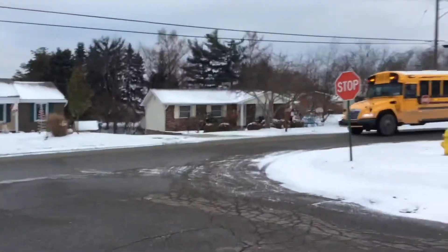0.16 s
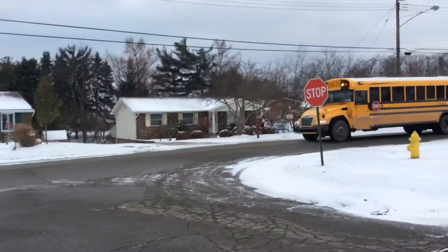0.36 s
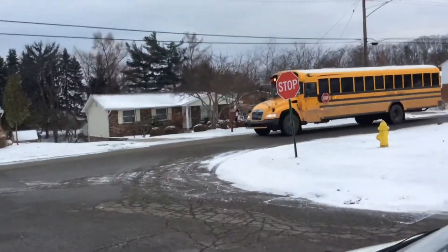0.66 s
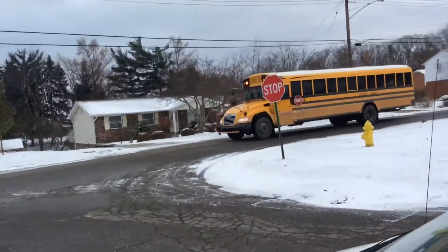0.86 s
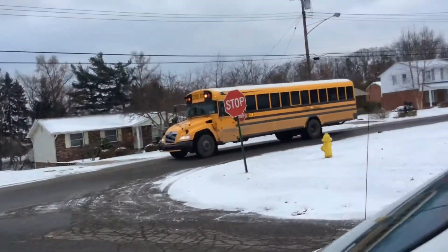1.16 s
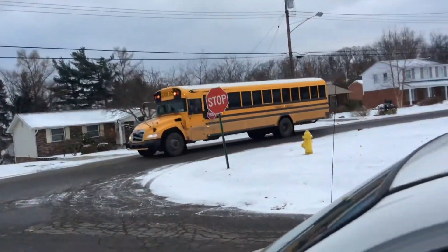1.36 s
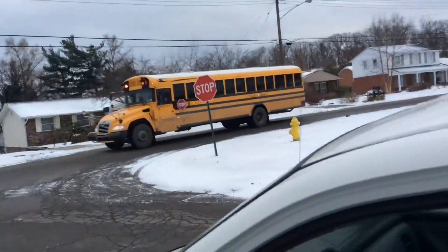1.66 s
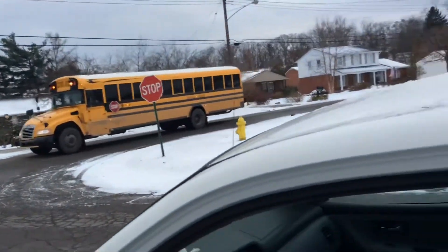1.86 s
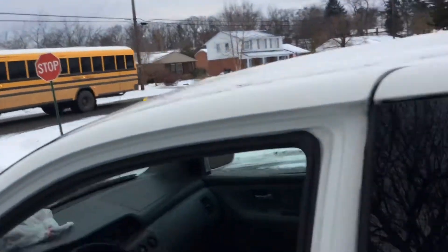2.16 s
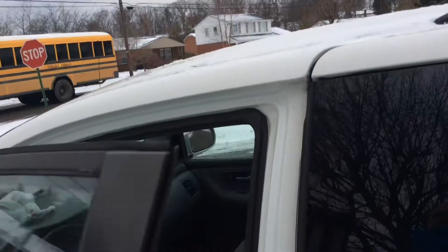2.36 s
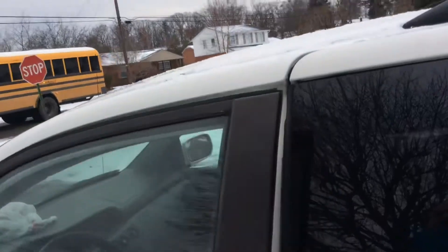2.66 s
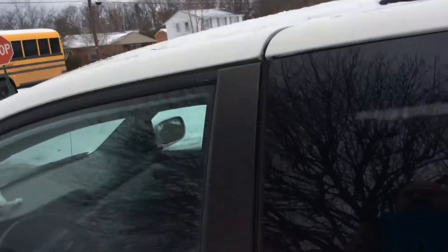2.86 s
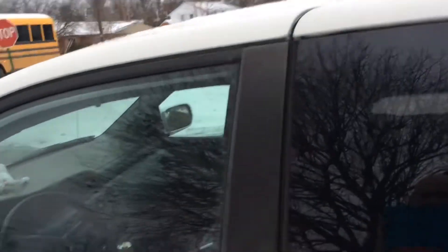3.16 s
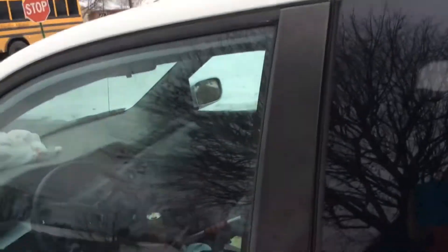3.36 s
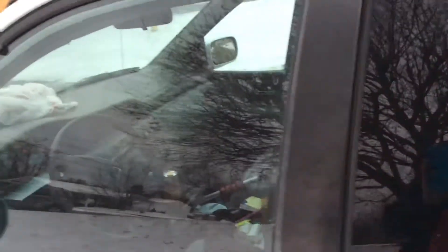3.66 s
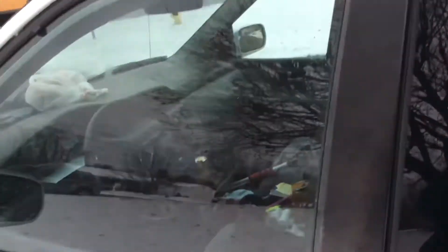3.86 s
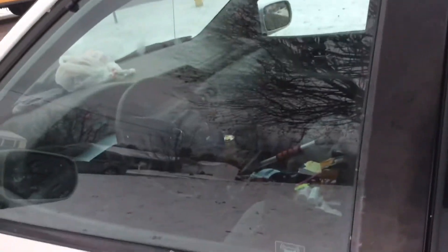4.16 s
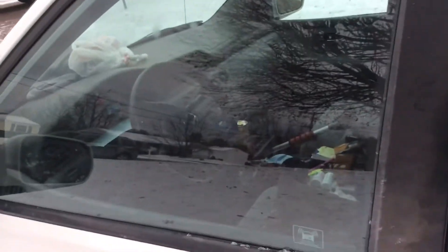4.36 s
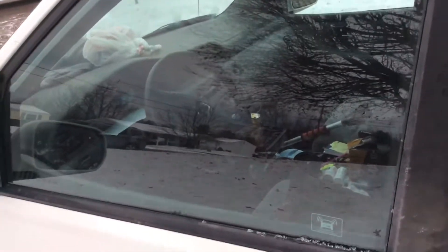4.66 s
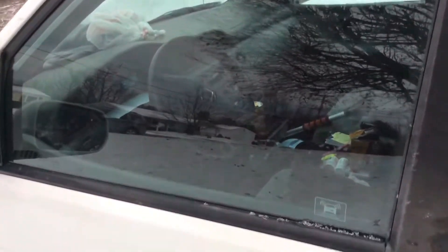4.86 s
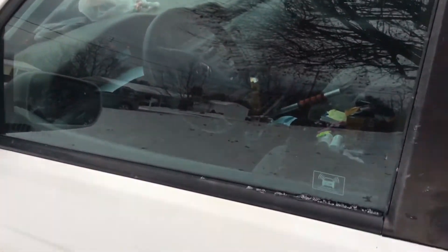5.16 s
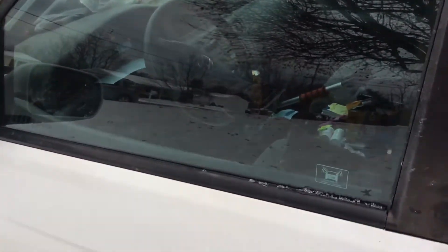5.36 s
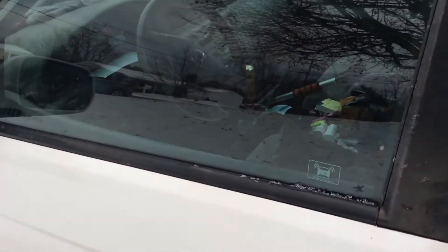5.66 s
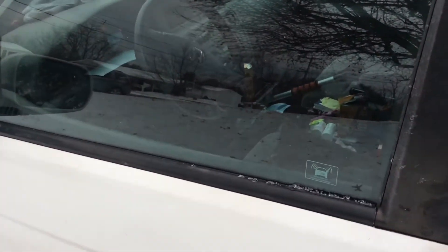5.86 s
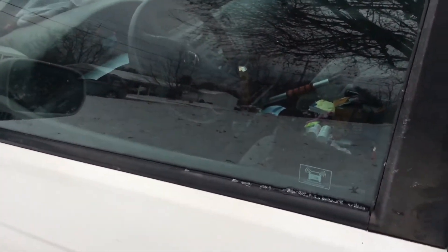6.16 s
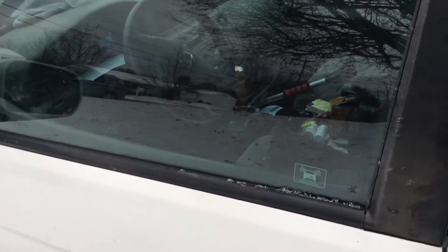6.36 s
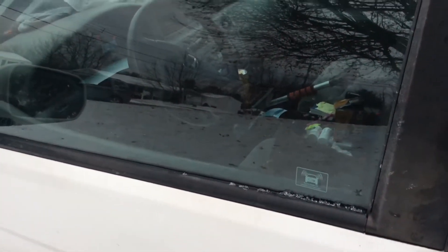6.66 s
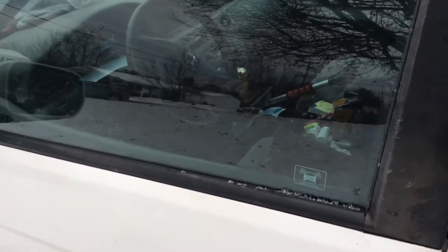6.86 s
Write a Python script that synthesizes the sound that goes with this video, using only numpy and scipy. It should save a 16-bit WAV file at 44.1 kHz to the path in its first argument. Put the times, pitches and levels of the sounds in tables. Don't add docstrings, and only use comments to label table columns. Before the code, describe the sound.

Low engine idle throughout, distant diesel bus with high trembling brake squeals, a hard double clack of a car door handle, then small taps and rubs.

```python
import sys
import numpy as np
from scipy import signal
from scipy.fft import rfft, irfft
from scipy.io import wavfile
from scipy.ndimage import map_coordinates

SR = 44100
rng = np.random.default_rng(int(sys.argv[2]) if len(sys.argv) > 2 else 0)


def magnitude_from_level(level_db):
    exponent = np.asarray(level_db, float) / 20
    return 10 ** exponent


def dump_mix(stems):
    frames = np.atleast_2d(stems).T
    limited = np.clip(frames, -1, 1)
    pcm = np.round(limited * 32767).astype(np.int16)
    wavfile.write(sys.argv[1], SR, pcm)


N = 308700
TIME = np.arange(N) / SR

# (time [s], tyre level [dB], fan level [dB])
ROLL = [(0, -67, -77), (.7, -65, -80.5), (1.5, -67, -79), (2.5, -68, -77), (3.5, -70, -76), (4.4, -73, -77),
        (5, -73, -73), (5.8, -72, -76), (7, -75, -78)]


def unit(x):
    return x / np.sqrt(np.mean(x ** 2) + 1e-20)


def curves(rows):
    s, *cols = np.transpose(rows)
    return [np.interp(TIME, s, c) for c in cols]


def wobble(rate):
    knots = rng.standard_normal(int(N * rate / SR) + 4)
    return map_coordinates(knots, [TIME * rate])


def noise(spectrum):
    f, db = np.transpose(spectrum)
    hz = np.fft.rfftfreq(N, 1 / SR)
    colour = magnitude_from_level(np.interp(np.log(hz + 1), np.log(f), db, -120, -120))
    return unit(irfft(rfft(rng.standard_normal(N)) * colour, N))


def tone(hz):
    return np.sqrt(2) * np.sin(2 * np.pi * np.cumsum(hz) / SR)


def add(track, s, sound):
    start = round(s * SR)
    track[start:start + len(sound)] += sound[:len(track) - start]


def ring(modes, attack, stretch=1, scatter=np.zeros(4)):
    t = np.arange(SR // 4) / SR
    out = np.zeros(len(t))
    for i, (hz, db, t60) in enumerate(modes):
        fade = magnitude_from_level(db + scatter[i] - 60 * t / (t60 * stretch))
        out += (-1) ** i * fade * np.sin(2 * np.pi * hz * t)
    return (1 - np.exp(-t / attack)) ** 2 * out


def swell(start, peak, end, depth_db, curve):
    away = np.abs(np.interp(TIME, [start, peak, end], [-1, 0, 1]))
    gate = np.clip(np.minimum(TIME - start, end - TIME) / 0.0052, 0, 1)
    return -depth_db * away ** curve, gate


def car():
    # (time [s], level [dB])
    hum = [(0, -36), (1, -36), (1.8, -38), (2.7, -36.5), (3.3, -36), (6, -35), (7, -36)]
    # (multiple of the firing rate, level [dB])
    car_orders = [(1.5, -61), (2, -58), (2.5, -60), (3, -64), (3.5, -63)]
    # (frequency [Hz], level [dB per Hz])
    rumble_colour = [(13, -58), (22, -20), (42, -21.5), (56, -18), (74, -5.5), (88, -6.5), (97, -11),
                     (151, -14.5), (254, -24), (329, -30.5), (454, -34.5), (546, -34.5), (676, -33),
                     (850, -60.5), (1100, -77), (1870, -120)]
    # (time [s], level [dB])
    shade = [(0, -3), (2, 0.5), (2.3, 3.5), (2.7, 3.5), (3.9, 3), (4.15, -12), (4.5, 2.5), (4.8, 2),
             (5.1, -2.5), (5.9, -1.5), (6.1, 1), (7, 4)]
    puff = 0.45
    firing_hz = 72.33 + 0.2 * wobble(4.31)
    db, = curves(hum)
    line = magnitude_from_level(db + 0.37 * wobble(5.7) + 0.12 * wobble(14.0)) * tone(firing_hz)
    orders = sum(magnitude_from_level(order_db + 0.84 * wobble(2.1)) * tone(k * firing_hz) for k, order_db in car_orders)

    rumble = magnitude_from_level(-44 + 0.9 * wobble(2.34)) * noise(rumble_colour)
    above_110 = signal.butter(2, 110, "highpass", fs=SR, output="sos")
    mid_band = signal.butter(2, [300, 500], "bandpass", fs=SR, output="sos")
    upper = signal.sosfiltfilt(above_110, rumble)
    middle = signal.sosfiltfilt(mid_band, rumble)
    puffs = puff * unit(line) / 2 * upper
    shading = (magnitude_from_level(curves(shade)[0]) - 1) * middle
    return line + orders + rumble + puffs + shading


def bus():
    # (time [s], firing rate [Hz], line level [dB], knock level [dB])
    engine = [(0, 43.79, -50, -74), (.95, 43.1, -47, -59), (1.3, 41.44, -56, -64), (2, 40.5, -58.5, -64),
              (2.3, 40.56, -62, -55.5), (2.75, 40.8, -61, -56.5), (3.5, 40.9, -44, -69),
              (4.3, 39.94, -53, -61.5), (7, 40.2, -51.5, -61)]
    # (multiple of the firing rate, level [dB])
    bus_orders = [(2, -56), (3, -63), (4, -59), (5, -64), (6, -65)]
    # (frequency [Hz], level [dB per Hz])
    knock_colour = [(1000, -36), (1150, -5), (1225, 1.5), (1300, -6.5), (1500, -30.5)]
    # (frequency [Hz], level [dB per Hz])
    clatter_colour = [(440, -25), (750, -12), (821, -17), (938, -7), (984, -0.5), (1030, -6.5), (1100, 1.5),
                      (1160, -4.5), (1330, -5.5), (1420, -7.5), (1760, -21), (2160, -24), (2670, -38),
                      (3180, -45), (4130, -55.5), (7000, -120)]
    # (frequency [Hz], level [dB per Hz])
    hiss_colour = [(1350, -30), (1550, -5.5), (1770, 3), (2050, -4), (2250, -16.5), (2500, -27.5),
                   (3000, -48)]
    idle_hz, clatter_db_per_hz = 40.2, 0.7
    hz, db, knock_db = curves(engine)
    line = magnitude_from_level(db + 1.5 * wobble(2.5)) * tone(hz)
    orders = sum(magnitude_from_level(order_db + 1.3 * wobble(3.0)) * tone(k * hz) for k, order_db in bus_orders)
    turn = 2 * np.pi * np.cumsum(hz / 3) / SR
    knock = magnitude_from_level(knock_db + 2.0 * np.cos(turn + 0.86)) * noise(knock_colour)
    clatter_db = -59.5 + clatter_db_per_hz * (hz - idle_hz)
    clatter = magnitude_from_level(clatter_db + 0.5 * wobble(3.4) + 0.8 * wobble(17)) * noise(clatter_colour)
    tyres = magnitude_from_level(curves(ROLL)[0] + 0.73 * wobble(1.0)) * noise(hiss_colour)
    return line + orders + knock + clatter + tyres


def fan():
    # (frequency [Hz], level [dB per Hz])
    fan_colour = [(1900, -30.5), (2300, -4.5), (2700, -1.5), (3000, -7.5), (3400, -8.5), (3800, -10.5),
                  (5000, -36)]
    return magnitude_from_level(curves(ROLL)[1] + 0.89 * wobble(3.13)) * noise(fan_colour)


def street_air():
    # (frequency [Hz], level [dB per Hz])
    air_colour = [(2500, -3), (3300, 0.5), (4000, -0.5), (5000, -3), (6300, -4), (8000, -1.5),
                  (10000, -4.5), (12500, -11.5), (15300, -18), (16000, -64.5)]
    return magnitude_from_level(-77) * noise(air_colour)


def squeal(start, peak, end, hz, db, depth_db, curve, rough_hz, flutter_db, slip=0):
    under_db, gate = swell(start, peak, end, depth_db, curve)
    level = magnitude_from_level(db + under_db + flutter_db * wobble(60))
    return gate * level * tone(hz - slip * under_db + rough_hz * wobble(210))


def brakes():
    # (start [s], peak [s], end [s], pitch [Hz], peak level [dB])
    grabs = [(-.06, 0.03, .19, 7950, -76), (.16, .185, .22, 8250, -80), (.385, .405, .43, 8000, -80),
             (.44, .53, .72, 7600, -75), (.71, .8, .85, 7720, -80), (.83, .89, .97, 7590, -75),
             (.96, 1.04, 1.09, 7700, -80), (1.08, 1.12, 1.19, 7700, -78), (1.16, 1.26, 1.5, 7570, -73),
             (1.48, 1.53, 1.58, 7700, -80), (1.56, 1.63, 1.73, 7620, -72), (1.74, 1.81, 1.94, 7570, -73),
             (1.97, 2.05, 2.1, 7570, -78), (2.08, 2.13, 2.26, 7620, -71), (2.21, 2.28, 2.33, 7950, -75),
             (2.3, 2.325, 2.42, 7800, -77), (2.4, 2.44, 2.51, 7740, -71), (2.5, 2.53, 2.6, 7750, -82),
             (0.25, 0.29, 0.385, 9130, -75), (0.93, 0.98, 1.19, 9070, -75), (1.7, 1.76, 1.9, 9050, -72),
             (1.89, 1.96, 2.03, 9130, -83), (1.99, 2.06, 2.11, 8980, -79), (2.09, 2.175, 2.27, 9030, -68),
             (2.25, 2.28, 2.4, 8960, -81)]
    # (start [s], peak [s], end [s], pitch [Hz], peak level [dB])
    squeals = [(2.638, 2.7, 2.87, 9230, -63), (3.18, 3.41, 3.57, 9190, -65), (3.992, 4.09, 4.3, 9250, -70),
               (4.15, 4.35, 4.6, 9200, -74), (4.5, 4.72, 5.0, 9130, -66), (4.9, 5.02, 5.25, 9110, -79),
               (2.49, 2.53, 2.57, 8700, -82), (2.585, 2.62, 2.78, 8640, -81),
               (2.88, 2.92, 2.98, 8415, -77.5), (3.11, 3.165, 3.26, 8350, -72),
               (3.3, 3.37, 3.45, 8610, -75), (3.88, 4.05, 4.22, 8500, -85), (4.196, 4.374, 4.56, 8600, -72),
               (4.52, 4.69, 4.95, 8480, -71.5), (2.679, 2.765, 2.9, 8070, -78.5),
               (3.06, 3.12, 3.3, 8125, -78), (3.2, 3.37, 3.6, 8090, -74), (4.88, 5.0, 5.2, 8560, -84)]
    # (start [s], peak [s], end [s], pitch [Hz], peak level [dB])
    top_squeals = [
        (2.45, 2.487, 2.7, 11820, -79),
        (3.65, 3.76, 4.13, 11830, -78),
    ]
    # (start [s], end [s], pitch [Hz], level [dB])
    peeps = [(3.72, 3.81, 7550, -69), (2.89, 3.2, 12050, -86), (3.2, 3.33, 6560, -86),
             (3.37, 3.52, 6560, -79), (4.05, 4.3, 6640, -84), (4.4, 5.2, 6550, -89), (3.25, 3.5, 5060, -83),
             (3.3, 3.51, 4620, -82), (2.65, 2.85, 5050, -88), (3.1, 3.2, 9400, -84), (3.7, 3.86, 4740, -86),
             (3.42, 3.52, 7270, -83), (2.06, 2.28, 4540, -83), (1.8, 1.9, 4560, -84),
             (.95, 1.06, 4560, -86), (4.3, 4.42, 5660, -86), (3.35, 3.52, 15300, -92),
             (2.61, 2.67, 6980, -85)]
    out = np.zeros(N)
    for row in grabs:
        out += squeal(*row, depth_db=8, curve=1.3, rough_hz=44.4, flutter_db=4.0, slip=6.5)
    for row in squeals:
        out += squeal(*row, depth_db=14.5, curve=1.5, rough_hz=18, flutter_db=2.5, slip=6)
    for row in top_squeals:
        out += squeal(*row, depth_db=11.0, curve=0.78, rough_hz=13, flutter_db=3.0, slip=28)
    for start, end, hz, db in peeps:
        middle = (start + end) / 2
        out += squeal(start, middle, end, hz, db, depth_db=5.0, curve=1.1, rough_hz=11.0, flutter_db=3.0)
    return out


def small_parts():
    # (time [s], pitch [Hz], level [dB], time to fall 60 dB [s])
    pings = [(2.207, 7050, -40, 0.007), (2.207, 6400, -50, .007), (2.826, 7230, -52, .016),
             (2.8455, 7300, -49, 0.012), (2.85, 7000, -48, .014), (2.848, 8200, -53, 0.012),
             (3.314, 7160, -48, .007), (3.4, 7800, -57, .006), (2.9885, 4600, -42, .012)]
    out = np.zeros(N)
    for s, hz, db, t60 in pings:
        add(out, s, ring([(hz, db, t60)], 0.00071))
    return out


def touches():
    # (time [s], ring level [dB], thud level [dB], thud pitch [Hz], ring fall time [s])
    handle = [(2.7945, -28.5, -20.5, 315, 0.058), (2.7995, -34, -21, 527, 0.024),
              (2.8035, -27.5, -22, 397, 0.041), (2.8089, -18.5, -18, 322, 0.052),
              (2.9918, -14, -11, 480, 0.013), (2.9955, -24, -34, 600, 0.02),
              (3.0043, -9.5, -26, 660, 0.0071), (3.0065, -31, -30, 705, 0.019),
              (3.0195, -13, -10, 600, 0.013), (3.1212, -19, -22.5, 521.4, 0.0084),
              (3.123, -31.5, -36, 600, .016), (3.1295, -40, -29, 400, 0.012),
              (3.151, -32.5, -22.5, 575, 0.0091), (3.1535, -39, -44, 654, 0.015),
              (3.1588, -43, -31, 600, 0.016)]
    # (time [s], ring level [dB], thud level [dB], thud pitch [Hz])
    taps = [(2.208, -46.5, -47, 594), (3.228, -50, -34.5, 600), (3.316, -58, -38, 450),
            (3.799, -51, -41, 550), (4.561, -42.5, -28.5, 660), (4.5922, -38, -24, 768),
            (4.618, -57, -29, 497), (5.594, -54, -56, 500), (5.753, -55, -57, 508), (5.967, -57, -30, 352),
            (6.084, -63, -39, 597), (6.391, -56, -38, 530), (6.531, -59, -36, 600),
            (6.552, -54, -32.5, 930.6), (6.824, -59, -41, 563), (6.895, -40, -44, 814),
            (6.969, -48, -37, 720)]
    # (time [s], level [dB])
    ticks = [(3.6207, -49), (6.038, -52), (6.858, -47), (6.869, -53), (6.883, -45), (6.906, -47),
             (6.933, -49), (6.948, -51)]
    # (frequency [Hz], level [dB], share of the ring fall time)
    shell = [(1149, 10.5, 0.52), (1585, 3, 0.21), (750, -9.5, 0.082), (2006, -9, 0.45)]
    tap_t60_s, tick_t60_s, tick_thud_hz = 0.023, 0.008, 600
    contacts = list(handle)
    contacts += [(*tap, tap_t60_s) for tap in taps]
    contacts += [(s, db, db, tick_thud_hz, tick_t60_s) for s, db in ticks]
    out = np.zeros(N)
    for s, ring_db, thud_db, thud_hz, t60 in contacts:
        scatter = rng.normal(0, 1.5, 4)
        add(out, s, magnitude_from_level(ring_db + 2) * ring(shell, t60 / 50, t60, scatter))
        add(out, s, ring([(thud_hz, thud_db + 7, 0.014)], 0.0007))
    return out


def hard_edges():
    # (time [s], level [dB], treble level [dB])
    cracks = [
        (2.208, -50, 0),
        (2.8089, -41, -8),
        (2.9919, -18, -9),
        (2.9945, -36, -3),
        (3.0041, -15, -1),
        (3.0188, -28, -14),
        (3.1208, -27, -10),
        (3.151, -42, -12),
        (3.228, -55, -6),
        (3.316, -56, 0),
    ]
    # (frequency [Hz], level [dB], time to fall 60 dB [s])
    snap = [(2290, 3.5, 0.0037), (3340, 3.5, 0.002), (5250, -7.5, 0.0016), (6760, -10.5, 0.003)]
    out = np.zeros(N)
    for s, db, treble_db in cracks:
        scatter = rng.normal(0, 1.5, 4) + [0, 0, treble_db, treble_db]
        add(out, s, -magnitude_from_level(db) * ring(snap, 0.00015, 1, scatter))
    return out


def hand():
    # (frequency [Hz], level [dB per Hz])
    palm, dull = [(2.785, 2.83, 2.96, -27), (3.02, 3.035, 3.15, -36.5), (3.16, 3.175, 3.2, -35),
                  (3.2, 3.28, 3.62, -47), (3.6, 3.63, 3.66, -27), (3.98, 4.045, 4.26, -49),
                  (4.56, 4.578, 4.6, -40.5), (4.595, 4.625, 4.76, -44.5), (5.96, 6.022, 6.045, -38),
                  (6.035, 6.054, 6.085, -33), (6.68, 6.7, 7, -51.5), (6.85, 7.0, 7.4, -48.5)], [(90, -42), (130, -0.5), (200, -3), (330, -4), (420, -4), (600, -45.5)]
    cups, hollow = [(2.79, 2.805, 2.75, -36.5), (2.825, 2.865, 2.8, -38.5), (3.02, 3.045, 3.1, -51),
                    (3.165, 3.18, 3.34, -47), (3.255, 3.28, 3.26, -43), (3.29, 3.36, 3.48, -48),
                    (3.55, 3.6, 3.63, -52), (3.6, 3.636, 3.68, -40), (4.0, 4.045, 4.28, -54),
                    (4.6, 4.64, 5.1, -64), (4.61, 4.63, 5.1, -64), (4.83, 4.865, 5.02, -58),
                    (6.02, 6.043, 6.068, -39), (6.08, 6.088, 6.1, -42), (5.965, 5.99, 6.03, -47),
                    (6.69, 6.745, 6.83, -46), (6.76, 6.79, 6.83, -53), (6.52, 6.54, 6.65, -50),
                    (6.81, 6.833, 6.88, -47.5), (6.87, 6.91, 7.6, -60), (6.94, 6.97, 7.2, -52)], [(330, -36), (450, -8), (545, 0), (640, -8), (850, -20), (1300, -45)]
    scrapes, bright = [(2.788, 2.815, 2.88, -30.5), (2.82, 2.855, 2.97, -48.5), (3.112, 3.125, 3.08, -37),
                       (2.985, 2.995, 3.004, -30.5), (3.15, 3.185, 3.27, -55), (3.3, 3.318, 3.35, -56),
                       (3.39, 3.43, 3.57, -56), (4.6, 4.64, 4.8, -53), (4.83, 4.862, 4.93, -52.5),
                       (6.03, 6.045, 5.86, -52), (6.84, 6.9, 7.1, -58)], [(550, -19), (780, 2), (1100, 11), (1900, 1), (2400, -11),
                                        (4200, -26), (5300, -37), (8000, -45)]
    brushes, muffled = [(2.79, 2.82, 2.97, -40.5), (2.985, 2.995, 3.1, -38), (3.115, 3.125, 3.2, -42),
                        (3.255, 3.28, 3.4, -64), (3.585, 3.628, 3.67, -42), (3.63, 3.645, 3.69, -59),
                        (4.595, 4.632, 5.25, -59), (6.535, 6.552, 6.5, -52)], [(400, -13), (650, 8), (1000, -1), (1700, -5.5), (2050, -13),
                                         (2350, -36.5), (3000, -57)]
    slides, gritty = [(2.805, 2.812, 2.79, -42), (2.82, 2.83, 2.79, -37), (2.84, 2.853, 2.885, -44.5),
                      (3.026, 3.048, 3.075, -41.5), (3.162, 3.183, 3.22, -47), (3.215, 3.232, 3.26, -52),
                      (4.59, 4.607, 4.65, -46), (4.62, 4.633, 4.64, -44.5), (3.121, 3.126, 3.134, -46)], [(500, -18), (800, 7), (1400, 4), (2100, -3.5), (2700, -14),
                                      (3500, -19.5), (4400, -24), (5400, -47)]
    rubs = [(palm, dull, 21), (cups, hollow, 22), (scrapes, bright, 24), (brushes, muffled, 22),
            (slides, gritty, 16)]
    lumps = magnitude_from_level(1.5 * wobble(110))
    out = np.zeros(N)
    for strokes, colour, depth_db in rubs:
        layer = unit(lumps * noise(colour))
        for start, peak, end, db in strokes:
            under_db, gate = swell(start, peak, end, depth_db, curve=1.16)
            out += gate * magnitude_from_level(db + under_db) * layer
    return out


def heavy_blows():
    # (time [s], level [dB], pitch [Hz], time to fall 60 dB [s], direction of the push)
    blows = [(2.815, -2, 95.4, 0.054, 1), (2.8151, -9.5, 54, 0.049, 1), (2.8481, -3, 105, 0.052, -1),
             (2.866, -18, 131, 0.092, 1), (2.9, -14.5, 76, 0.14, -1), (2.9895, -10, 130, .016, 1),
             (2.997, -4, 55, 0.042, -1), (3.018, 1, 425, 0.0037, 1), (3.019, 4, 110, 0.021, -1),
             (3.1265, -16, 58, 0.048, -1), (3.153, -22, 88, 0.02, 1), (3.1588, -12, 404, 0.0086, 1),
             (3.1597, -10, 120, 0.022, -1), (3.199, -23, 104, 0.12, 1), (3.228, -18.5, 85, 0.067, 1),
             (3.266, -17, 118, 0.06, -1), (3.633, -14.5, 232, 0.031, 1), (3.639, -8, 192, 0.012, 1),
             (3.6452, -19, 272, 0.045, 1), (4.5617, -17, 216, 0.0072, 1), (4.594, -5, 332, 0.0047, 1),
             (4.5963, -10.5, 105, 0.039, -1), (4.618, -9.5, 278, 0.0077, 1), (4.6223, -12, 107, 0.042, -1),
             (6.0443, -20, 356, 0.036, -1), (6.056, -22.5, 187, 0.083, 1), (6.702, -23.5, 114, 0.073, 1)]
    push = np.zeros(N)
    for s, db, hz, t60, direction in blows:
        rise_s = 0.068 / hz
        add(push, s, direction * ring([(hz, db - 0.5, t60)], rise_s))
    treble_cut = signal.butter(2, 1900, fs=SR, output="sos")
    return signal.sosfilt(treble_cut, push)


def scene():
    street = car() + bus() + fan() + street_air() + brakes()
    phone = small_parts() + touches() + hard_edges() + hand() + heavy_blows()
    return (street + phone)[None]


def drop_faint_treble(x):
    # (start [s], end [s], lowest frequency [Hz], highest frequency [Hz])
    starved = [(2.11, 2.21, 9400, 11000), (2.14, 2.19, 11000, 15000), (2.66, 2.85, 9550, 10300),
               (2.67, 2.74, 10300, 11600), (3.35, 3.52, 9500, 10400), (3.35, 3.42, 10400, 11600),
               (4.03, 4.15, 9600, 10200), (4.33, 4.4, 9600, 12000), (4.6, 4.86, 9450, 13800),
               (2.5, 2.72, 12400, 13600), (2.9, 3.15, 12400, 13800), (3.72, 3.88, 12200, 14000),
               (3.97, 4.15, 12400, 14000)]
    hz, t, z = signal.stft(x, SR, nperseg=1024)
    for start, end, low, high in starved:
        band = (hz > low) & (hz < high)
        z[..., band[:, None] & (t > start) & (t < end)] = 0
    return signal.istft(z, SR, nperseg=1024)[1][..., :N]


def roll_off(x):
    return signal.sosfilt(signal.butter(12, 15420, fs=SR, output="sos"), x)


def record(dry):
    low_cut = signal.butter(3, 36, "highpass", fs=SR, output="sos")
    mix = drop_faint_treble(signal.sosfilt(low_cut, dry))
    return roll_off(mix)


dry = scene()
out = record(dry)
dump_mix(out)
```